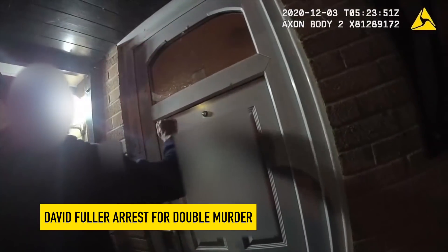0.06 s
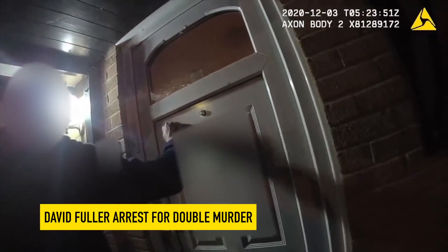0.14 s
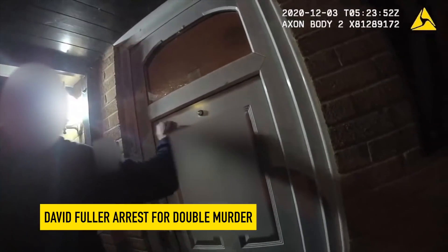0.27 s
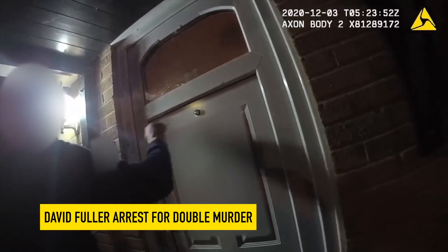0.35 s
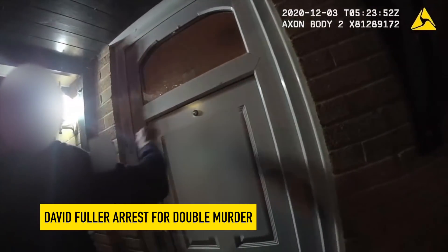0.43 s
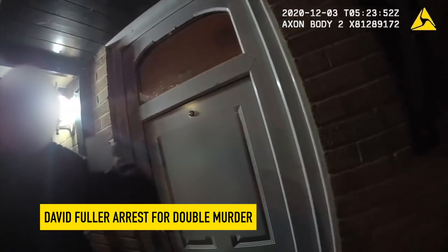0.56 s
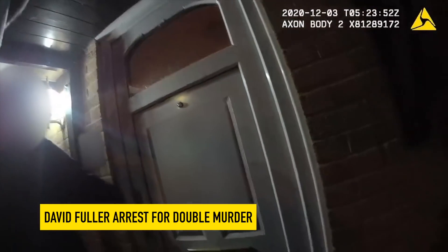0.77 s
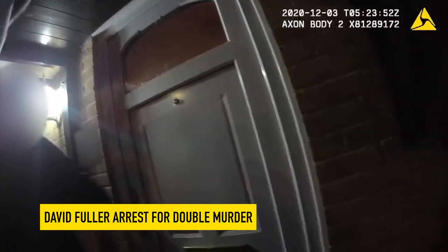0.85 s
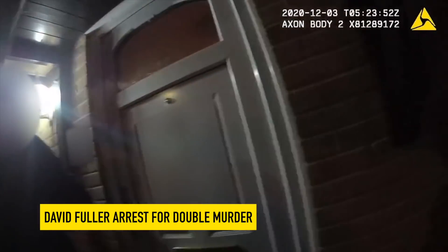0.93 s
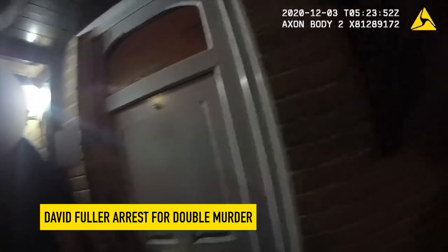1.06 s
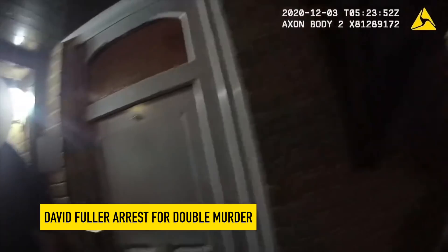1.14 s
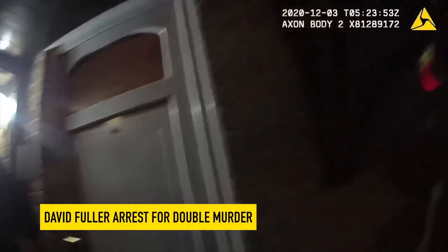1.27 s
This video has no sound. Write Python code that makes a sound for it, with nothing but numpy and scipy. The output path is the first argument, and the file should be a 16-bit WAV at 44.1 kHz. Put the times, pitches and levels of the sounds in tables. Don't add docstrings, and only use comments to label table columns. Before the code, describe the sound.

Knuckles knock on a panelled front door in a brick porch. One rap is already ringing at 0 s; the last, slightly louder, lands at 0.2 s, a woody thump with quick frame rattle, faint metal flap buzz and short echo. A very low hall boom fades by 0.5 s. Soft footfalls at 0.7 and 0.9 s and a barely audible strap creak near 1.15 s sit in steady night air and hiss, close chest microphone.

```python
import sys
import numpy as np
from scipy import signal
from scipy.fft import rfft, irfft, next_fast_len
from scipy.io import wavfile

SR = 44100
rng = np.random.default_rng(int(sys.argv[2]) if len(sys.argv) > 2 else 0)


def bounce(signal):
    frames = np.transpose(np.atleast_2d(signal))
    limited = np.clip(frames, -1, 1)
    pcm = np.round(limited * 32767).astype(np.int16)
    wavfile.write(sys.argv[1], SR, pcm)


def linear_from_db(decibels):
    return 10 ** (np.asarray(decibels, float) / 20)


N = 57330
LEAD = 4410
TOTAL = N + LEAD


def at_hz(points, hz, column=1):
    points = np.array(points)
    return np.interp(np.log(hz), np.log(points[:, 0]), points[:, column])


def clock():
    return (np.arange(TOTAL) - LEAD) / SR


def since(start):
    t = clock() - start
    return np.maximum(t, 0), t >= 0


def drift(rate_hz):
    r = np.exp(-80 * np.pi * rate_hz / SR)
    noise = rng.standard_normal(N // 40 + 2300)
    slow = signal.lfilter([1], [1, -2 * r, r * r], noise)[2000:]
    return np.interp(np.arange(TOTAL) / 40, np.arange(len(slow)), slow / slow.std())


def ring(clicks, hz, t60):
    r = linear_from_db(-60 / (t60 * SR))
    w = 2 * np.pi * hz / SR
    return signal.lfilter([0, np.sin(w)], [1, -2 * r * np.cos(w), r * r], clicks + 1e-18)


def band_noise(low_hz, high_hz, noise):
    return signal.sosfilt(signal.butter(2, [low_hz, high_hz], "band", fs=SR, output="sos"), noise)


def bands(gain, channels=1):
    edges = 22 * 2 ** np.arange(0, 9.5, 1 / 3)
    white = rng.standard_normal((2, channels, TOTAL))
    out = 0
    for k, (low, high) in enumerate(zip(edges, edges[1:])):
        out = out + gain(np.sqrt(low * high)) * band_noise(low, high, white[k % 2])
    return out


def swell(centre, half, hz):
    t = clock() - centre
    return np.exp(-.5 * (t / half) ** 2) * np.cos(2 * np.pi * hz * t)


# start in seconds, peak level in dB.
RAPS = [
    (-.042, -18),
    (.2107, -16),
]
# delays in seconds, signs, levels in dB.
REBOUND_S = [0, .0034, .009, .0107, .0157, .0236, .0276, .0324]
REBOUND_SIGN = [1, 1, -1, 1, 1, 1, -1, 1]
REBOUND_DB = [-3, -1.5, 4, 1, -4, -13, -11.5, -21]
DOOR_HZ = [79, 156, 240, 279, 421, 552, 646, 711, 804, 888, 1015, 1085, 1290, 1855]
# level in dB, t60 in seconds.
DOOR_MODES = [(-25.5, 0.126), (-12, 0.15), (-2.5, 0.071), (-2, 0.082), (-9.5, 0.32), (-13.5, 0.24),
              (-27.5, 0.15), (-5.5, 0.1), (6.5, 0.036), (-9.5, 0.12), (-3.5, 0.077), (2, 0.068),
              (-7.5, 0.055), (3, 0.031)]
CONTACT_HZ = 1020
THUMP_DB, THUMP_BASS_HZ = -3, 444
MODES_DB, REBOUND_RING_DB = -10, -10.5


def door():
    clicks = np.zeros((2, TOTAL))
    for start, db in RAPS:
        for k, delay in enumerate(REBOUND_S):
            i = int((start + delay) * SR) + LEAD
            clicks[min(k, 1), i] += linear_from_db(db + REBOUND_DB[k]) * REBOUND_SIGN[k]
    soften = signal.bessel(4, CONTACT_HZ, norm="mag", fs=SR, output="sos")
    knuckle, rebounds = signal.sosfilt(soften, clicks)

    thump = linear_from_db(THUMP_DB) * (knuckle + rebounds) * SR / CONTACT_HZ / np.pi
    out = signal.lfilter(*signal.butter(2, THUMP_BASS_HZ, "high", fs=SR), thump)
    drive = knuckle + linear_from_db(REBOUND_RING_DB) * rebounds
    for hz, (db, t60) in zip(DOOR_HZ, DOOR_MODES):
        out = out + linear_from_db(MODES_DB + db) * ring(drive, hz, t60)
    return out


# frequency in Hz, level in dB, t60 in seconds.
WASH = [(100, -31, 0.25), (254, -26, 0.34), (494, -32.5, 0.33), (1220, -18.5, 0.095), (2200, -28.5, 0.073),
        (4140, -24, 0.049), (8200, -27.5, 0.09), (13000, -34.5, 0.042)]
WASH_RISE_S, WASH_DELAY_S = .003, .002
LATE_DB, LATE_T60_S, LATE_HZ = -20.5, 0.61, 2470


def wash():
    def gain(hz):
        shape = 0
        for start, db in RAPS:
            t, _ = since(start + WASH_DELAY_S)
            early = linear_from_db(-60 * t / at_hz(WASH, hz, column=2))
            late = linear_from_db(LATE_DB - 60 * t / LATE_T60_S) / (1 + (hz / LATE_HZ) ** 2)
            shape = shape + linear_from_db(db) * (early + late) * (1 - np.exp(-t / WASH_RISE_S))
        return shape * linear_from_db(at_hz(WASH, hz)) * np.sqrt(SR / hz)
    return bands(gain)[0]


FLAP_HZ = [2460, 3800, 6850, 7100, 7350]
# level in dB, t60 in seconds.
FLAP_MODES = [(-30, 0.068), (-27, 0.01), (-30.5, 0.024), (-37.5, 0.02), (-33, 0.028)]
FLAP_DELAY_S, FLAP_TICKS_PER_S, FLAP_T60_S = 0.0022, 900, 0.079


def flap():
    chatter = 0
    for start, db in RAPS:
        t, is_open = since(start + FLAP_DELAY_S)
        chatter = chatter + linear_from_db(db - 60 * t / FLAP_T60_S) * is_open
    out = 0
    for hz, (db, t60) in zip(FLAP_HZ, FLAP_MODES):
        ticks = (rng.random(TOTAL) < FLAP_TICKS_PER_S / SR) * rng.standard_normal(TOTAL)
        out = out + linear_from_db(db) * ring(ticks * chatter, hz, t60)
    return out


# frequency in Hz, level in dB per Hz.
AIR = [(25, -3), (45, 1), (130, -9.5), (300, -6), (600, -7.5), (1500, -7.5), (5000, -14.5), (14000, -23)]
# time in seconds, level in dB.
STIR = [(0, -3), (.2, 0), (.45, -0.5), (.62, 0), (.85, -.5), (1.0, -1), (1.16, 0), (1.3, 0.5)]
AIR_DB, AIR_PATCHY_DB = -59, 1.4


def night():
    air = bands(lambda hz: linear_from_db(at_hz(AIR, hz) + AIR_PATCHY_DB * drift(5.5)))[0]
    stir_db = np.interp(clock(), *np.transpose(STIR))
    return linear_from_db(AIR_DB + stir_db) * air / air.std()


# frequency in Hz, level in dB per Hz.
HISS = [(25, 8.5), (100, -10), (300, -45), (1000, -25.5), (3000, -14), (7000, -17.5), (14000, -20.5)]
HISS_DB = -60.5


def capsule_hiss():
    hiss = bands(lambda hz: linear_from_db(at_hz(HISS, hz)), channels=2)[:, LEAD:]
    return linear_from_db(HISS_DB) * hiss / hiss.std()


# centre in seconds, frequency in Hz, level in dB, half width in seconds.
BOOMS = [
    (0.028, 26.2, -46.5, 0.07),
    (.25, 27.4, -59, 0.022),
    (.35, 35.2, -41, 0.061),
]


def hall_boom():
    return sum(linear_from_db(db) * swell(centre, half, hz) for centre, hz, db, half in BOOMS)


# start in seconds, frequency in Hz, level in dB, t60 in seconds.
STEPS = [
    (.725, 338, -45.5, 0.086),
    (.726, 235, -48, 0.11),
    (.915, 615, -55.5, 0.081),
    (0.923, 450, -54, 0.23),
    (.018, 407, -48, 0.046),
    (1.16, 684, -62, 0.11),
]
STEP_ROUGH = 0.82


def footfalls():
    out = 0
    for start, hz, db, t60 in STEPS:
        t, _ = since(start)
        tone = np.sin(2 * np.pi * hz * t + STEP_ROUGH * drift(31))
        out = out + linear_from_db(db - 60 * t / t60) * tone * (1 - np.exp(-t * hz / 3))
    return out


# time in seconds, level in dB.
SHUFFLE = [(0.4, -93), (0.456, -74), (0.576, -91), (0.692, -72.5), (0.782, -65), (0.832, -108),
           (0.964, -60.5), (1.104, -92), (1.118, -96), (1.152, -84), (1.266, -99), (1.3, -92)]
SHUFFLE_HZ = (69, 145)
SHUFFLE_DB = 5


def shuffle():
    rumble = band_noise(*SHUFFLE_HZ, rng.standard_normal(TOTAL))
    level_db = SHUFFLE_DB + np.interp(clock(), *np.transpose(SHUFFLE))
    return linear_from_db(level_db) * rumble / rumble.std()


# centre in seconds, frequency in Hz, level in dB, half width in seconds.
CREAK = [
    (1.125, 283, -65, .055),
    (1.165, 1418, -65, .05),
]
CREAK_ROUGH = .25


def strap_creak():
    out = 0
    for centre, hz, db, half in CREAK:
        out = out + linear_from_db(db) * swell(centre, half, hz) * (1 + CREAK_ROUGH * drift(19))
    return out


RIGHT_DB, RIGHT_VENT_HZ, RIGHT_BASS_HZ = 6, 321, 19
RIGHT_TOP_HZ, RIGHT_LAG_S = 8950, 4e-6


def right_port(pressure):
    for hz in (RIGHT_VENT_HZ, RIGHT_BASS_HZ):
        pressure = signal.lfilter(*signal.butter(1, hz, "high", fs=SR), pressure)
    pressure = signal.lfilter(*signal.butter(1, RIGHT_TOP_HZ, fs=SR), pressure)
    size = next_fast_len(len(pressure))
    lag = np.exp(-2j * np.pi * np.fft.rfftfreq(size, 1 / SR) * RIGHT_LAG_S)
    return linear_from_db(RIGHT_DB) * irfft(rfft(pressure, size) * lag, size)[:len(pressure)]


def scene():
    raps = door() + wash() + flap() + hall_boom()
    caller = footfalls() + shuffle() + strap_creak()
    left = raps + caller + night()
    return np.array([left, right_port(left)])[:, LEAD:]


def roll_off(x):
    return signal.sosfilt(signal.butter(12, 14400, fs=SR, output="sos"), x)


OFFSET = [
    [-.0022],
    [-.00325],
]
CUTOFF_HZ = 14900


def record(dry):
    top_cut = signal.cheby2(10, 40, CUTOFF_HZ, fs=SR, output="sos")
    wet = signal.sosfilt(top_cut, dry + capsule_hiss())
    return roll_off(wet + OFFSET)


dry = scene()
out = record(dry)
bounce(out)
```